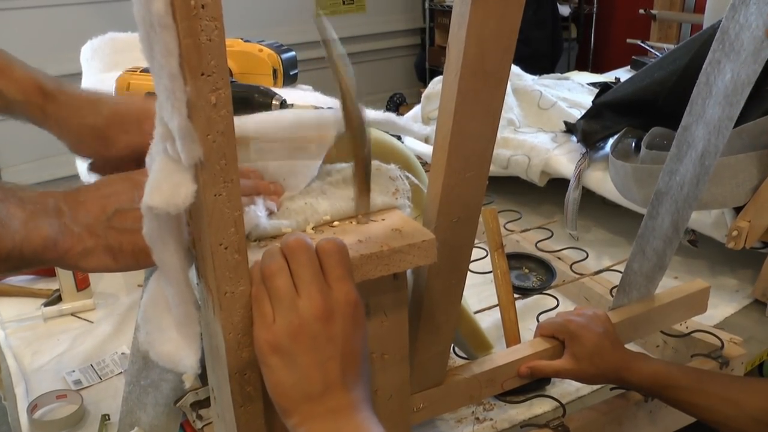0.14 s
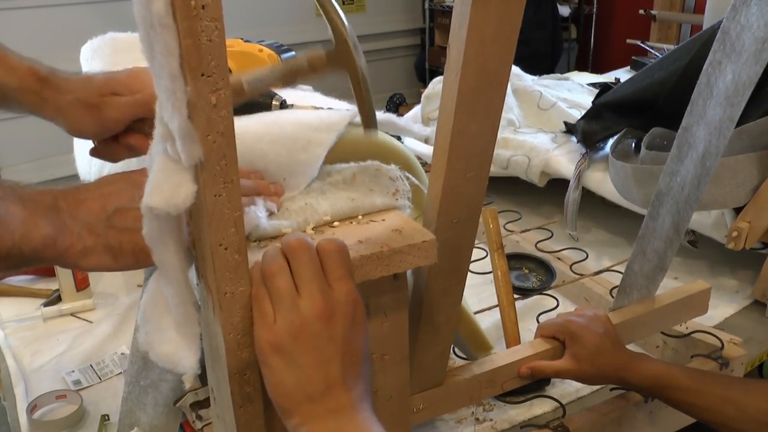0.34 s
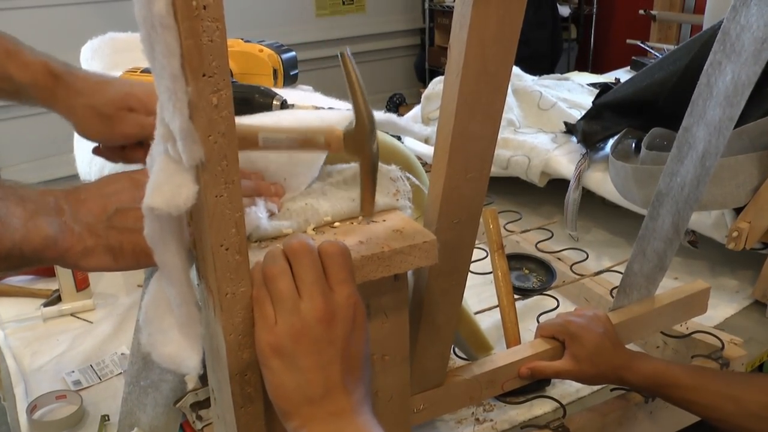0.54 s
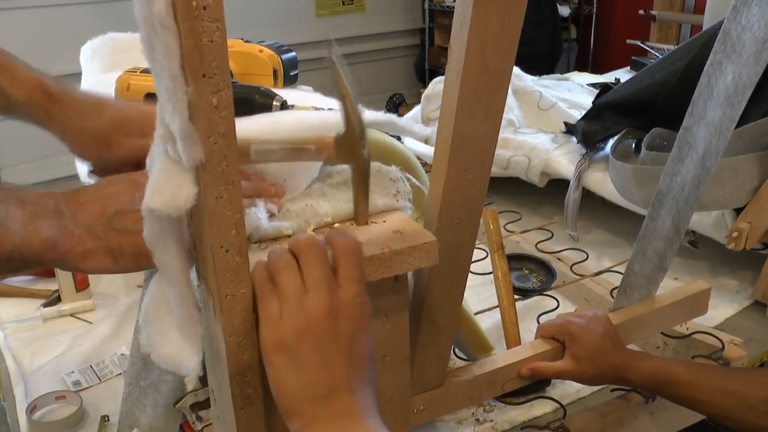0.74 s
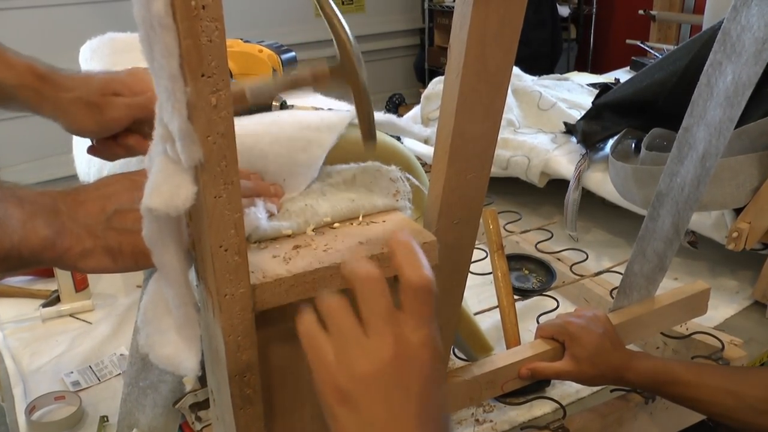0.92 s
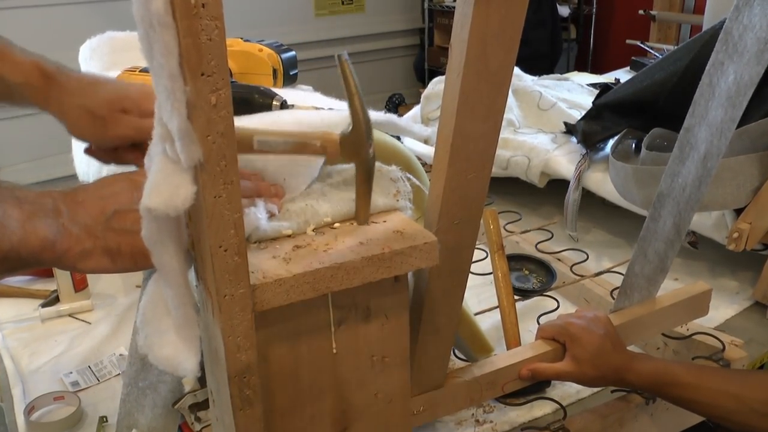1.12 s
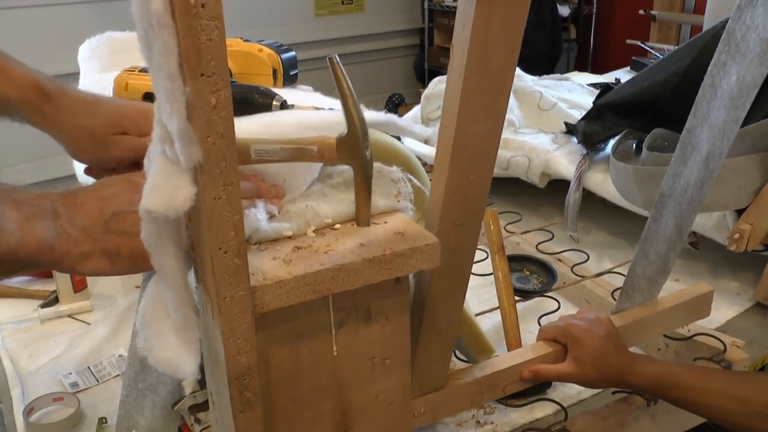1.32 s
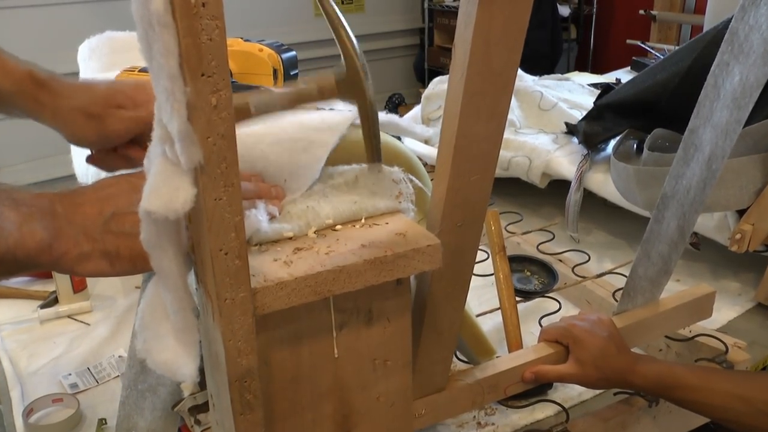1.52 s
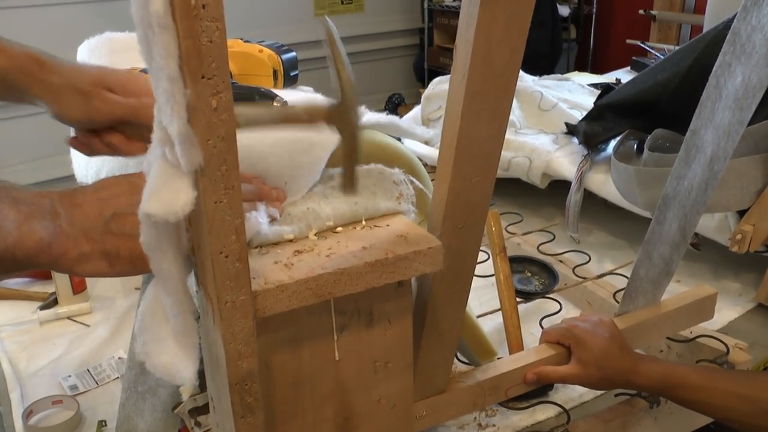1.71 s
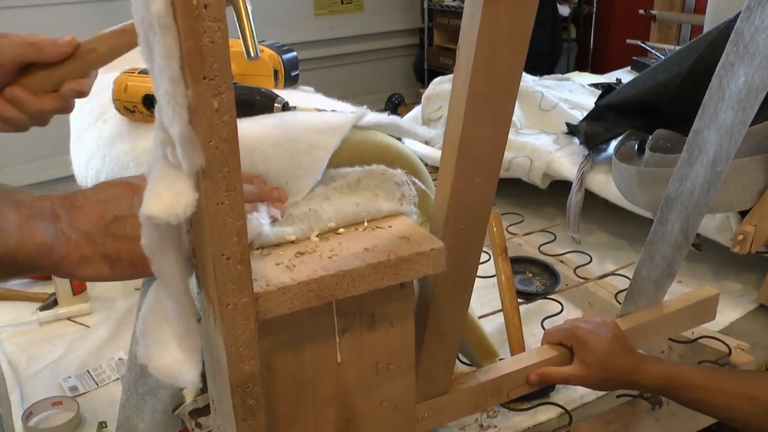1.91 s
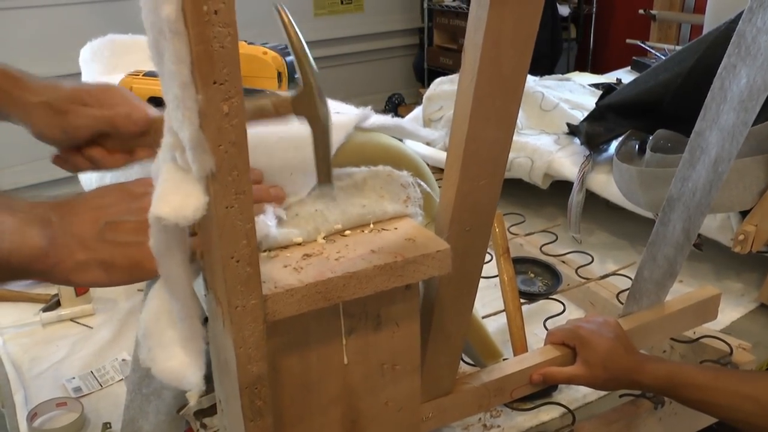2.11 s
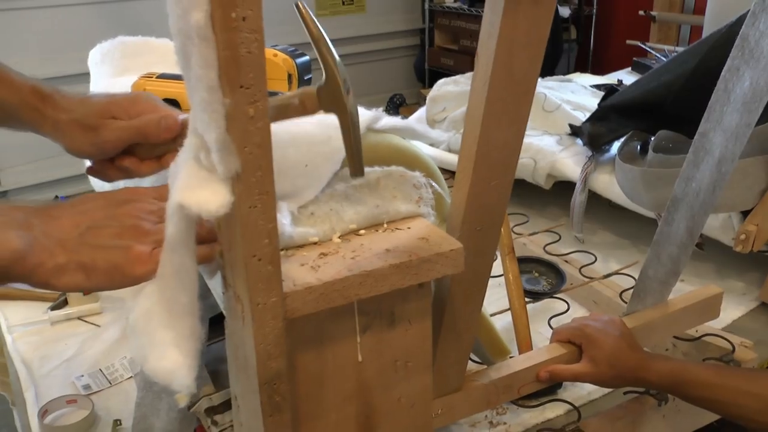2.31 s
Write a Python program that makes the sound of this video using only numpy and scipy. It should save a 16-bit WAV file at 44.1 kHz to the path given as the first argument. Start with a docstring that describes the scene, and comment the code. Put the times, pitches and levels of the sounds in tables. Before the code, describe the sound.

Six loud, evenly spaced hammer knocks on a wooden frame slightly overload a close microphone in a small workshop. A brief squeaky scrape comes first, and a soft cloth rustle follows over a faint machine hum.

```python
"""A small workshop: a claw hammer drives a dowel into a wooden frame, so close that the microphone
overloads. Each quick, even blow is a click, a crack, a thump and the ring of frame and hammer head,
then the room. The first is already dying at the start, under a brief squeaky scrape of uneven slips.
After the last blow, cloth padding rustles across the wood over a faint machine hum and dull air noise."""
import sys
import numpy as np
from scipy import signal
from scipy.fft import rfft, irfft
from scipy.io import wavfile

SR = 44100
rng = np.random.default_rng(int(sys.argv[2]) if len(sys.argv) > 2 else 0)


def file_out(sig):
    """Save sig as 16-bit WAV at sys.argv[1]."""
    # one column per channel
    cols = np.atleast_2d(sig).T
    # limit, then scale
    lim = np.clip(cols, -1, 1)
    pcm = np.round(lim * 32767).astype(np.int16)
    wavfile.write(sys.argv[1], SR, pcm)


N = 103635
T = np.arange(N) / SR


def from_db(db):
    return 10 ** (np.asarray(db) / 20)


def unit_rms(x):
    return x / np.sqrt(np.mean(x ** 2) + 1e-20)


def at_hz(points, hz):
    """Read a table on a log-frequency axis."""
    freqs, values = np.transpose(points)
    return np.interp(np.log(hz + 1e-9), np.log(freqs), values)


def butter(x, hz, kind="low", order=2):
    return signal.sosfilt(signal.butter(order, hz, kind, fs=SR, output="sos"), x)


def noise(spectrum):
    """Coloured noise of rms 1."""
    gain = from_db(at_hz(spectrum, np.fft.rfftfreq(N, 1 / SR)))
    return unit_rms(irfft(rfft(rng.standard_normal(N)) * gain, N))


def flutter(top_hz):
    """Low-passed random motion of rms 1."""
    return unit_rms(butter(rng.standard_normal(N), top_hz))


def decay(t60_s):
    return np.exp(-np.log(1000) * T / t60_s)


def struck(modes, scatter_db=0):
    """Decaying sines of alternating sign, with optional random level scatter."""
    out = 0
    for k, (hz, db, t60_s) in enumerate(modes):
        gain = (-1) ** k * from_db(db + scatter_db * rng.standard_normal())
        out += gain * decay(t60_s) * np.sin(2 * np.pi * hz * T)
    return out


def delayed(x, delay_s):
    return np.interp(np.arange(N) - round(delay_s * SR), np.arange(N), x, left=0, right=0)


# Hammer blows. Each row: start in seconds, gain in dB, crack gain in dB, contact edge in Hz,
# room treble gain in dB, ring tilt in dB per octave, click pitch in Hz, click and thump gains in dB.
BLOWS = [(-0.07, -2, -9, 7000, 4.5, -9, 5300, 5, 0), (0.2081, -1, 7.5, 11010, 1, -3.5, 5310, 6.5, 3),
         (0.4933, -0.5, -0.5, 12970, 1.5, -1, 5470, 8, 2), (0.7853, 0, 6, 13000, 1, -1, 4560, 4, 1),
         (1.0858, 1.5, 7.5, 3800, 1, 1, 3180, 1.5, -1.5), (1.3533, 0, 8.5, 10200, 2.5, 1, 3620, 2.5, -2.5),
         (1.6094, -.5, 10.5, 6380, 5.5, 2, 6050, 3, -1.5)]


def hammer():
    """The face clicks on the dowel just before the frame gives; every blow excites the same room."""
    out = 0
    common_room, fresh_share = room_tail(), .48
    for start_s, db, crack_db, edge_hz, treble_db, tilt_db, click_hz, click_db, thump_db in BLOWS:
        room = np.sqrt(1 - fresh_share ** 2) * common_room + fresh_share * room_tail()
        room_bass = butter(room, hz=1500, order=1)
        room_treble = from_db(treble_db) * (room - room_bass)
        burst = soft_contact(crack(crack_db) + room_bass + room_treble, edge_hz)
        steel = head_ring()
        wood = frame(tilt_db, thump_db)
        click = from_db(click_db) * decay(t60_s=.008) * np.sin(2 * np.pi * click_hz * T)
        blow = click + burst + steel + delayed(wood, delay_s=.0005) + far_echo(wood)
        out += from_db(db) * delayed(blow, start_s)
    return out


# Crack spectrum. Each row: frequency in Hz, relative density in dB.
CRACK_SPECTRUM = [(500, -5.5), (1200, -0.5), (2000, 8), (2600, -12.5), (5200, 4.5), (8000, -3.5),
                  (15000, -20.5)]


def crack(gain_db, echo_db=-19.5):
    """The impact's short noise burst and its echo off a close surface."""
    direct = from_db(gain_db - 1) * noise(CRACK_SPECTRUM) * decay(t60_s=.012)
    return direct + from_db(echo_db) * delayed(direct, delay_s=.02)


def soft_contact(burst, edge_hz, leak_db=-12.5):
    """A softer contact loses most of the treble above its edge."""
    treble = butter(burst, edge_hz, "high", order=5)
    return butter(burst, edge_hz, order=5) + from_db(leak_db) * treble


# Damped first give of the wood. Each row: frequency in Hz, relative level in dB, T60 in seconds.
THUMP_MODES = [(349.46, 12, 0.071), (568.3, 5, 0.037), (730.3, 10, 0.033), (1109, 3.5, 0.023),
               (2024, -1.5, 0.037)]
# Frame modes, one entry each per list: frequency in Hz, relative level in dB, T60 in seconds.
FRAME_HZ = [256, 292, 328, 352, 379, 432, 486, 562, 633, 652, 739, 880, 1025, 1058, 1149, 1248, 1535]
FRAME_DB = [-8, -13, -11, -8.5, -6, -5, -10, -7, -5.5, -17, -7.5, -20.5, -23.5, -36, -22.5, -18, -22]
FRAME_T60_S = [0.18, 0.24, 0.11, 0.25, 0.21, 0.24, 0.24, 0.12, 0.19, .42, 0.099, 0.22, 0.32, 0.78, 0.27,
               0.15, 0.18]


def frame(tilt_db, thump_db, pivot_hz=440, radiation_hz=191):
    """The wood thumps and rings on. As the dowel seats, higher modes gain on lower ones."""
    thump = from_db(thump_db) * struck(THUMP_MODES)
    tilted_db = FRAME_DB + tilt_db * np.log2(np.divide(FRAME_HZ, pivot_hz))
    ring = struck(zip(FRAME_HZ, tilted_db, FRAME_T60_S), scatter_db=1)
    return butter(thump + ring, radiation_hz, "high")  # narrow boards radiate little bass


def head_ring(hz=13325, db=-39.5, t60_s=.28):
    """One high mode of the steel head, blurred by a flickering level."""
    blur = 1 + .35 * flutter(top_hz=77)
    return struck([(hz, db, t60_s)]) * blur


# Room response. Each row: frequency in Hz, relative density in dB.
ROOM_SPECTRUM = [(40, -27.5), (140, -25.5), (195, -26.5), (245, -5.5), (380, -4.5), (520, -4), (700, -5),
                 (900, -12.5), (1400, -16), (2450, -28), (3500, -22.5), (4200, -26.5), (5200, -25.5),
                 (8500, -35), (15000, -44)]
# Room decay. Each row: frequency in Hz, T60 in seconds.
ROOM_T60_S = [(100, 1), (300, 0.43), (700, 0.42), (1800, 0.38), (4800, 0.41), (13000, 0.37)]


def room_tail(gain_db=-9, build_s=.0019):
    """Dense reflections build up quickly and die band by band."""
    spectrum, hz = rfft(noise(ROOM_SPECTRUM)), np.fft.rfftfreq(N, 1 / SR)
    edges_hz = [0, 180, 450, 1000, 2500, 5000, 9000, SR / 2]
    tail = 0
    for low, high in zip(edges_hz, edges_hz[1:]):
        band = irfft(spectrum * ((hz >= low) & (hz < high)), N)
        tail += band * decay(at_hz(ROOM_T60_S, (low + high) / 2))
    return from_db(gain_db) * tail * (1 - np.exp(-T / build_s))


def far_echo(wood, centre_hz=656, gain_db=-26.5):
    """The frame's ring comes back hollow off the far wall."""
    hollow = butter(wood, [centre_hz / 1.2, centre_hz * 1.2], "band")
    return from_db(gain_db) * delayed(hollow, delay_s=.07)


# Scrape envelope. Each row: time in seconds, gain in dB.
SCRAPE_ENVELOPE = [(0, -30), (.015, -29), (.06, -31.5), (.08, -34.5), (.105, -28), (.13, -31.5), (.15, -38),
                   (.19, -39), (.23, -59)]
# Scrape resonances. Each row: frequency in Hz, relative level in dB, T60 in seconds.
SQUEAK_MODES = [(1035, -1, .1), (1110, -2, .04), (2030, -6, .015), (2380, -3, .1), (3000, -4, .012),
                (3270, -5, .014), (5200, -10, .003)]


def scrape(slips_per_s=3000, grit_db=-5.5):
    """Uneven slips excite a few squeaky resonances, with some grit."""
    slips = (rng.random(N) < slips_per_s / SR) * rng.standard_normal(N)
    squeak = 0
    for hz, db, t60_s in SQUEAK_MODES:
        ringing = signal.fftconvolve(slips, struck([(hz, 0, t60_s)]))
        squeak += from_db(db) * unit_rms(ringing[N // 2:N // 2 + N])
    grit = from_db(grit_db) * unit_rms(butter(slips, hz=4200))
    envelope = from_db(np.interp(T, *np.transpose(SCRAPE_ENVELOPE), right=-200))
    return (unit_rms(squeak) + grit) * envelope


# Cloth friction spectrum. Each row: frequency in Hz, relative density in dB.
CLOTH_SPECTRUM = [(300, 7), (700, 2.5), (2000, -4.5), (4000, -6), (6000, -9), (8000, -21), (15000, -13.5)]


def cloth_rustle(peak_s=2.24, rise_s=.11, fall_s=.055, peak_db=-57):
    """Cloth is pulled across the wood in one grainy swell."""
    width_s = np.where(T < peak_s, rise_s, fall_s)
    swell = np.exp(-((T - peak_s) / width_s) ** 2 / 2)
    grain = np.exp(.3 * flutter(top_hz=400))
    return from_db(peak_db) * swell * unit_rms(noise(CLOTH_SPECTRUM) * grain)


# Machine tone. Each row: frequency in Hz, rms level before the waver in dB.
HUM_TONES = [(226, -55.5)]


def machine_hum(waver_depth=.43):
    """A faint machine tone whose level wavers slowly."""
    hum = 0
    for hz, db in HUM_TONES:
        waver = 1 + waver_depth * flutter(top_hz=2.9)
        hum += from_db(db) * np.sqrt(2) * np.sin(2 * np.pi * hz * T) * waver
    return hum


# Workshop air spectrum. Each row: frequency in Hz, relative density in dB.
AIR_SPECTRUM = [(25, -9), (70, -5.5), (250, -2.5), (450, -11.5), (900, -16), (2000, -24.5), (5000, -30.5),
                (9000, -40.5), (15000, -46.5)]


def air(rms_db=-53):
    """Steady, dull air noise."""
    return from_db(rms_db) * noise(AIR_SPECTRUM)


def scene():
    """All sources at one microphone."""
    return (hammer() + scrape() + cloth_rustle() + machine_hum() + air())[None]


def record(dry):
    """The input overloads into flat tops; the deepest bass and the top are cut."""
    ceiling, knee = .87, 8
    bass_cut_hz, top_cut_hz = 16, 15800
    clipped = dry / (1 + np.abs(dry / ceiling) ** knee) ** (1 / knee)
    bass_cut = butter(clipped, bass_cut_hz, "high", order=1)
    top_filter = signal.firwin(255, top_cut_hz, fs=SR)
    return signal.fftconvolve(bass_cut, top_filter[None], mode="same", axes=1)


dry = scene()
out = record(dry)
file_out(out)
```